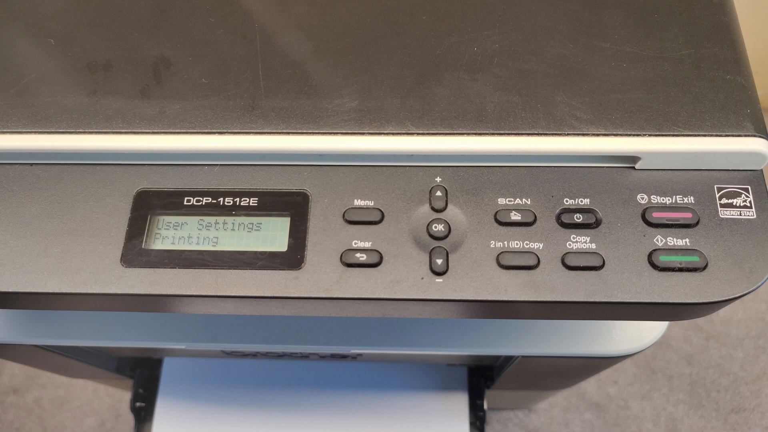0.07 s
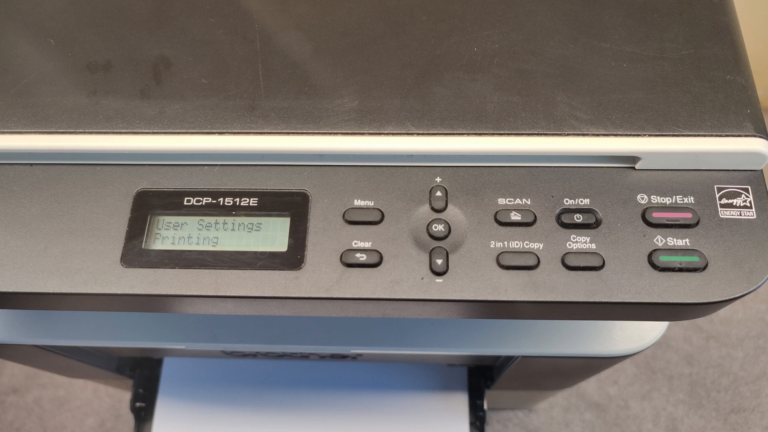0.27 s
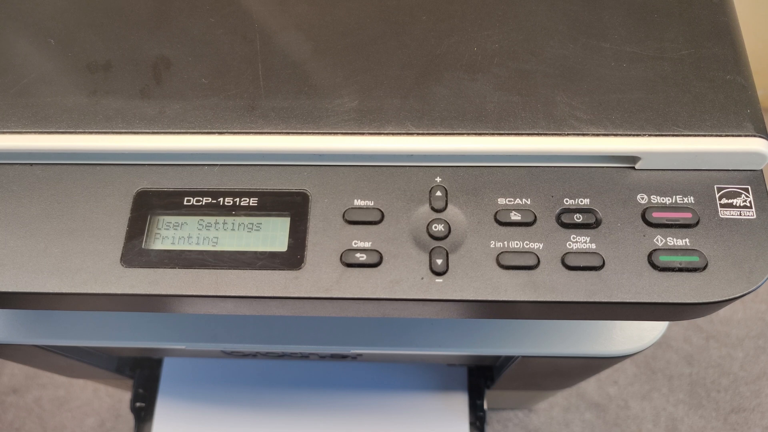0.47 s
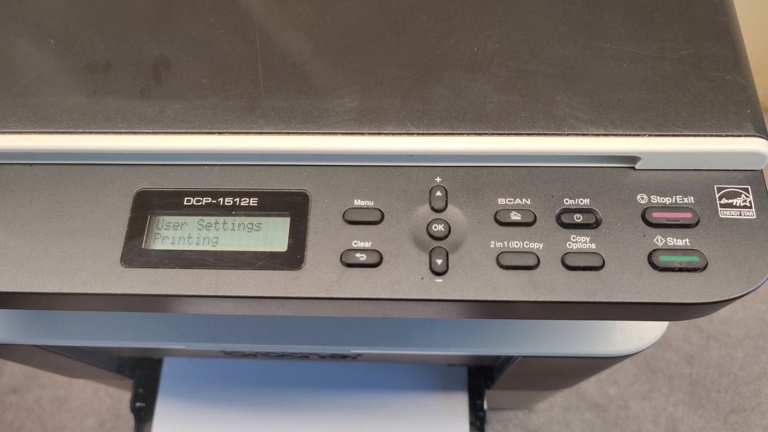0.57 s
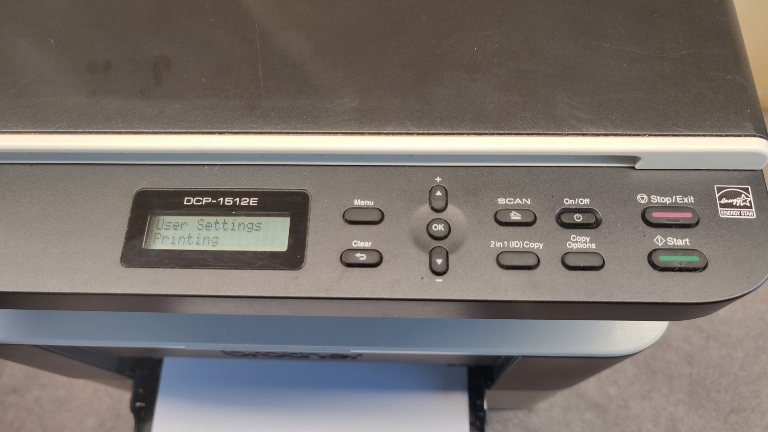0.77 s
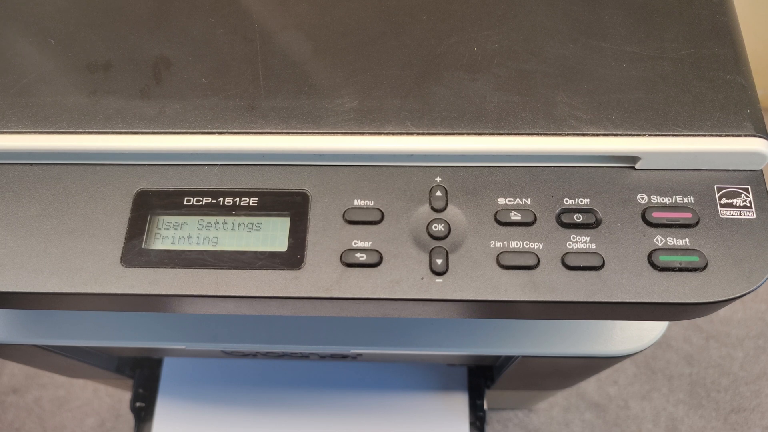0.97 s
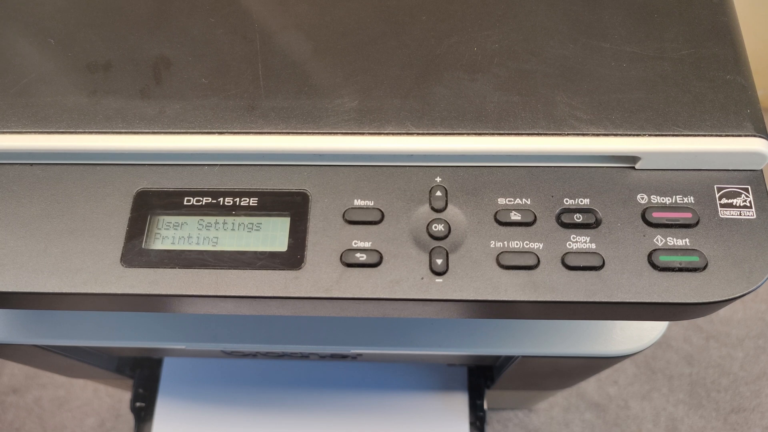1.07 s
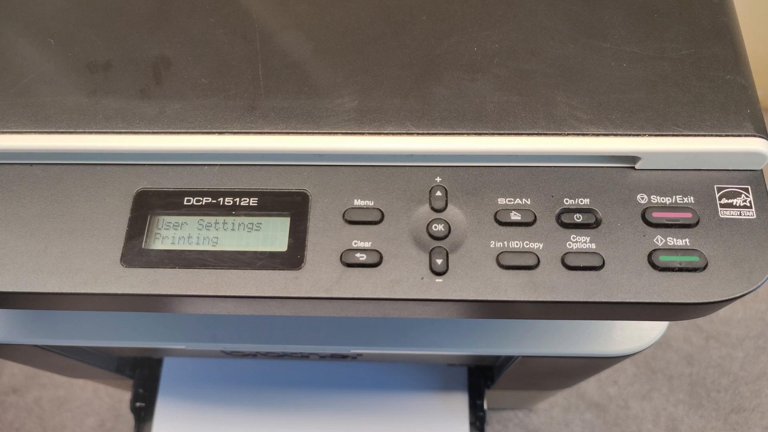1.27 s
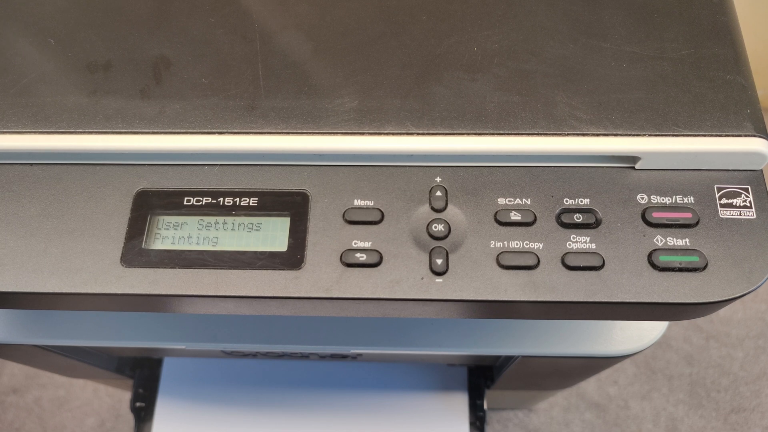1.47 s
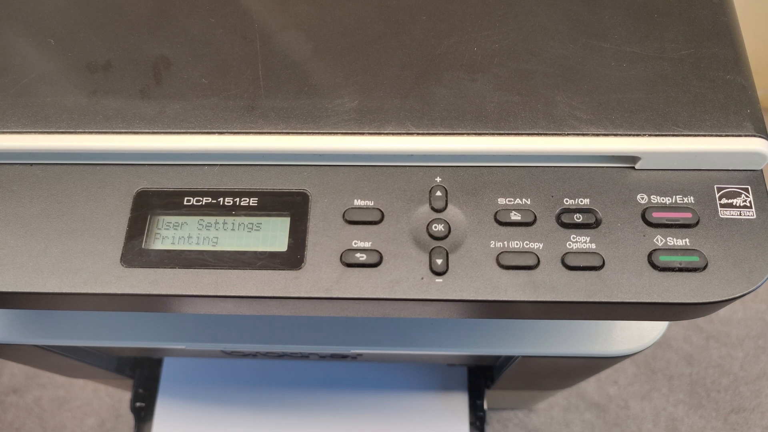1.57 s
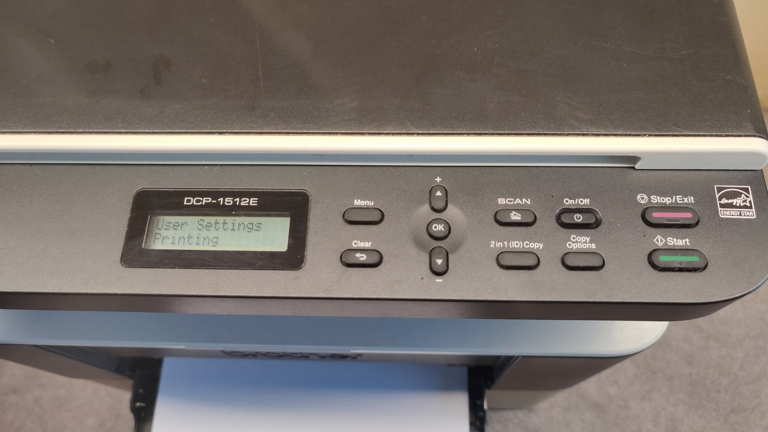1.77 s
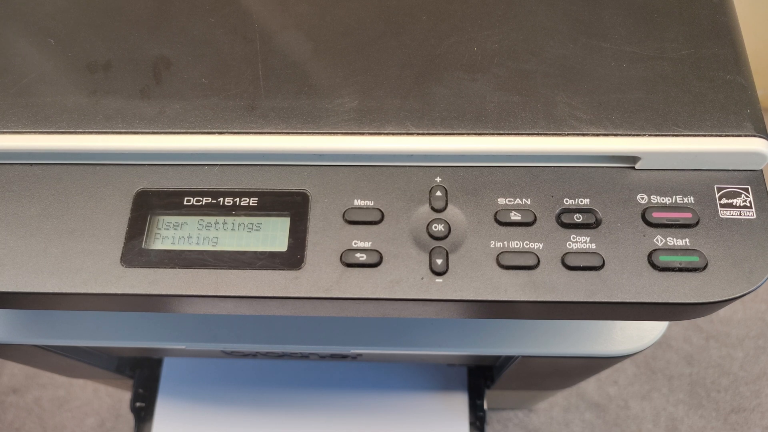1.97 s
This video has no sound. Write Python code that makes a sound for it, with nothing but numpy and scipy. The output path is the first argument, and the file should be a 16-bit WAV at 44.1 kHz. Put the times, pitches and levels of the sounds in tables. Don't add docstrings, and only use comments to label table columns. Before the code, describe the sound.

In a quiet room, a nearby laser printer ticks faintly, clacks loudly and whirs into motion; a mirror motor whine sweeps upward and vanishes while gears, fan hiss and sliding paper continue, with a late soft clack.

```python
import sys
import numpy as np
from scipy import signal
from scipy.io import wavfile
from scipy.ndimage import uniform_filter1d

SR = 44100
rng = np.random.default_rng(int(sys.argv[2]) if len(sys.argv) > 2 else 0)


def boost_factor(decibels):
    exponent = np.asarray(decibels, float) / 20
    return 10 ** exponent


def waveform_to_disk(signal):
    frames = np.transpose(np.atleast_2d(signal))
    scaled = np.clip(frames, -1, 1) * 32767
    samples = np.round(scaled).astype(np.int16)
    wavfile.write(sys.argv[1], SR, samples)


N = 88552
T = np.arange(N) / SR
POWER_ON_S = 0.388
MIC_EDGE_HZ = 15420


def evened(x):
    return x / np.sqrt(np.mean(x ** 2) + 1e-20)


def read(points, hz):
    f, value = np.transpose(points)
    return np.interp(np.log(hz + 1), np.log(f + 1), value)


def curve(points, axis=1):
    return np.interp(T, np.array(points)[:, 0], np.array(points)[:, axis])


def ramp(start_s, length_s):
    return np.clip((T - start_s) / length_s, 0, 1)


def wander(hz):
    rates = np.geomspace(hz / 8, hz, 12)
    return evened(sum(np.sin(2 * np.pi * (f * T + rng.random())) / np.sqrt(f) for f in rates))


def drifting(grid, bins):
    return evened(uniform_filter1d(uniform_filter1d(grid, bins, 0), 8, 1))


# (frequency [Hz], left-right level [dB])
LEFT_TILT = [(60, -2.5), (130, 0.5), (290, 0.5), (640, 5), (1400, -1.5), (3080, 1), (6770, -4), (14900, 4)]
# (frequency [Hz], phase lead [rad])
LEFT_LEAD = [(60, 0.3), (170, 0), (280, 0.2), (430, 0.94), (1000, 0.98), (2000, 1.23), (5000, 1.63),
             (15000, 1.5)]


def noise(db_of, same, patchy_db, placed=True):
    hz = np.fft.rfftfreq(1024, 1 / SR)
    a, b, c, d, patches = rng.standard_normal((N // 256 + 5, 513, 5)).T
    patches = drifting(patches, 8)
    shared = np.clip(read(same, hz), 0, 1)[:, None]
    left = a + 1j * b
    right = shared * left + np.sqrt(1 - shared ** 2) * (c + 1j * d)
    side = boost_factor(read(LEFT_TILT, hz) / 2) * np.exp(.5j * read(LEFT_LEAD, hz))
    side = side[:, None] ** placed
    colour = boost_factor(db_of(hz)[:, None] + patchy_db * patches)
    z = np.array([left * side, right / side]) * colour
    return evened(signal.istft(z, nperseg=1024, noverlap=768)[1][:, :N])


def tone(hz, db, pan_db, lead):
    turn = 2 * np.pi * (np.cumsum(hz) / SR + rng.random())
    left = boost_factor(pan_db / 2) * np.sin(turn + lead / 2)
    right = boost_factor(-pan_db / 2) * np.sin(turn - lead / 2)
    return np.sqrt(2) * boost_factor(db) * np.array([left, right])


def running():
    return ramp(POWER_ON_S, 0.02)


def speed():
    slip, catch_up_s = .15, .065
    return 1 - slip * np.exp(-np.maximum(T - .42, 0) / catch_up_s)


# (frequency [Hz], density [dB per Hz])
ROOM_COLOUR = [(12, -8), (36, -25.5), (56, -6), (85, -17.5), (176, -29.5), (272, -19), (340, -36),
               (500, -27), (2930, -47.5), (9000, -60.5), (14000, -55.5)]
# (frequency [Hz], left-right likeness [0-1])
ROOM_LIKENESS = [(60, 0.77), (240, 0.98), (940, 0.24), (3750, 0.084), (14900, 0.045)]


def room():
    level = boost_factor(-57 + 0.5 * wander(6.8))
    return level * noise(lambda f: read(ROOM_COLOUR, f), ROOM_LIKENESS, patchy_db=-3.0, placed=False)


# (order [multiple of shaft speed], level [dB])
FAN_ORDERS = [(1, -64), (2, -61.5), (3, -66), (4, -70), (5, -67), (6, -68.5), (7, -69.5)]


def fan():
    shaft_hz, wobble_db = 51.73, 2.5
    hz, out = shaft_hz * speed(), 0
    for order, db in FAN_ORDERS:
        pan_db, lead = read(LEFT_TILT, order * shaft_hz), read(LEFT_LEAD, order * shaft_hz)
        out = out + tone(order * hz, db + wobble_db * wander(9.14), pan_db, lead)
    return running() * out


# (frequency [Hz], width [Hz], level [dB])
PANELS = [(238.5, 40, 8), (627.6, 44, 8.5), (1300, 270, -11)]


def case_db(hz):
    power = sum(boost_factor(db) ** 2 / (1 + (2 * (hz - f) / width) ** 2) ** 2 for f, width, db in PANELS)
    return 10 * np.log10(power)


# (frequency [Hz], density [dB per Hz])
RUMBLE_COLOUR = [(35, -37), (55, -27), (80, -7), (120, -9), (420, -12), (520, -6), (751, -15.5), (1000, -9),
                 (1800, -29.5), (3000, -47)]
# (time [s], level [dB])
GEAR_EFFORT = [(0.47, -46.5), (0.66, -51.5), (0.67, -49.5), (1.082, -50), (1.116, -46), (1.156, -49.5),
               (1.982, -47), (2.0, -49.5)]
# (frequency [Hz], density [dB per Hz])
AIR_COLOUR = [(710, -52), (1200, -2.5), (1500, -4), (5220, -13), (7200, -16.5), (7900, -28), (9000, -30.5),
              (14300, -34.5), (15400, -52)]
# (frequency [Hz], left-right likeness [0-1])
LIKENESS = [(60, 1), (150, 0.88), (300, 0.99), (600, 0.64), (1200, 0.19), (2500, 0.91), (5000, 0.31),
            (14000, 0.22)]


def rumble_and_air():
    effort = boost_factor(curve(GEAR_EFFORT) + 48.5)
    rumble = boost_factor(-52) * noise(lambda f: read(RUMBLE_COLOUR, f), LIKENESS, patchy_db=2.0)
    panels = boost_factor(-57.5) * noise(case_db, LIKENESS, patchy_db=-0.1)
    air = boost_factor(-58.5) * noise(lambda f: read(AIR_COLOUR, f), LIKENESS, patchy_db=-2.95)
    return running() * (effort * (rumble + panels) + air)


# (time [s], level [dB])
SHEET_CONTACT = [(.58, -9.5), (.7, -5), (.95, -14.5), (1.4, -6), (1.7, -2), (1.87, 0), (2.01, 2.5)]


def sizzle():
    centre_hz, width_hz = 14250, 800
    band = noise(lambda f: -20 * np.log10(1 + (2 * (f - centre_hz) / width_hz) ** 2), LIKENESS, patchy_db=4.0)
    db = -69 + 0.59 * curve(SHEET_CONTACT) + 1.5 * wander(22)
    return boost_factor(db) * ramp(.53, 0.016) * band


# (frequency [Hz], density [dB per Hz])
PAPER_COLOUR = [(710, -48), (1200, 0), (1780, -8.5), (2250, -4), (5000, -7.5), (7300, -12.5), (8000, -24.5),
                (14100, -24), (15300, -14.5)]


def paper():
    grain = boost_factor(1.3 * evened(uniform_filter1d(rng.standard_normal(N), 200)))
    rub = noise(lambda f: read(PAPER_COLOUR, f), LIKENESS, patchy_db=2.0)
    return (T > SHEET_CONTACT[0][0]) * boost_factor(-53.5 + curve(SHEET_CONTACT)) * grain * rub


# (time [s], length [s], frequency [Hz], level [dB])
PANEL_RINGS = [
    (.485, .06, 905, -60),
    (.545, .065, 1400, -58),
    (.664, .03, 2460, -57),
]


def rings():
    out = 0
    for s, length, hz, db in PANEL_RINGS:
        swell = np.sin(np.pi * ramp(s, length) ** .7)
        out = out + swell * tone(hz + 0 * T, db, 0, .6)
    return out


# (time [s], whine [Hz])
MIRROR_PITCH = [(.63, 1300), (.672, 2400), (.74, 4290), (.82, 6460), (.86, 7330), (.962, 9460),
                (1.102, 12070), (1.23, 14250), (1.32, 15750)]
# (order [multiple of whine], level [dB], heard from [s])
WHINE_ORDERS = [(1 / 2, -3, 1.12), (1, 0, .635), (3 / 2, -6, .915), (2, -4, .775), (3, -8, .73)]
# (frequency [Hz], level [dB])
HOUSING_DB = [(1900, -70), (2450, -62), (3000, -69), (3800, -64), (5000, -67), (6300, -66), (7100, -61),
              (7800, -84), (11000, -80), (13000, -73), (14250, -65), (14700, -74), (15500, -76)]


def mirror():
    gain_db, ripple_db, fuzz_hz = 2.5, 2, 45
    hz, out = curve(MIRROR_PITCH), 0
    for order, db, from_s in WHINE_ORDERS:
        heard = (order * hz < MIC_EDGE_HZ) * ramp(from_s, .025) * (T < MIRROR_PITCH[-1][0])
        ripple = boost_factor(gain_db + ripple_db * np.array([wander(80), wander(80)]))
        whine = tone(order * hz + fuzz_hz * wander(150), db + read(HOUSING_DB, order * hz), -1.5, 1.2)
        out = out + heard * ripple * whine
    return out


# (order [multiple of tooth rate], level [dB], mesh [load column, 0 = none],
# left-right level [dB], left lead [rad])
GEAR_ORDERS = [
    (.25, -.5, 2, -11, 0.91),
    (.294, .5, 4, 5.5, 0.7),
    (.3122, -59.5, 0, -1, 0.15),
    (.4995, 1.5, 3, 5.5, 0.99),
    (.749, -73, 0, -14, 1),
    (1.0, 5, 1, 1, -1.4),
    (1.769, -76, 0, -1, 0.46),
]
# (time [s], motor pinion [dB], drum [dB], idler [dB], roller [dB])
MESH_LOAD = [(0.62, -70, -62, -60, -72), (0.704, -61, -52, -66, -55), (0.758, -64, -55, -63, -75),
             (0.808, -62, -59, -63, -57), (0.858, -77, -62, -59, -61), (0.93, -60, -52, -67, -65),
             (1.008, -66, -62, -60, -61), (1.142, -60, -53, -69, -62), (1.188, -69, -64, -63, -54),
             (1.226, -69, -58, -59, -70), (1.334, -59, -53, -64, -56), (1.392, -64, -58, -64, -65),
             (1.606, -66, -57, -61, -56), (1.722, -61, -56, -68, -64), (1.756, -59, -58, -72, -56),
             (1.838, -71, -57, -60, -59), (1.946, -60, -56, -69, -53), (2.0, -64, -60, -65, -68)]


def gears():
    tooth_hz = 1899.5 * speed()
    out = 0
    for order, db, mesh, pan_db, lead in GEAR_ORDERS:
        low = order < .6
        load_db = curve(MESH_LOAD, axis=mesh) if mesh else 1.1 * wander(6.46)
        if mesh in (1, 2):
            load_db = load_db - 6 * np.clip((.64 - T) / .15, 0, 1)
        hz = order * tooth_hz * (1 + .006 * low * wander(10))
        wobble_db = 1.5 * 2.2 ** low * wander(30)
        out = out + tone(hz, db + load_db + wobble_db, pan_db, lead)
    return ramp(.41, 0.043) * out


# (frequency [Hz], level [dB], t60 [s])
LATCH_MODES = [(106, -2.5, 0.16), (272, 2, 0.032), (424, -13, 0.05), (633, 2.5, 0.064), (1010, -11, 0.048),
               (1190, 3, 0.055), (2097, 0, 0.11)]


def latch_ring(t, burst, bright):
    short = t[:1500]
    rattle = rng.standard_normal((3, 1500))[0]
    knock = rattle * np.minimum(short / 0.0011, 1) * np.exp(-short / burst)
    modes = 0
    for hz, db, t60 in LATCH_MODES:
        tilt = (hz / 1000) ** (bright - 1)
        modes = modes + boost_factor(db - 60 * t / t60) * tilt * np.sin(2 * np.pi * hz * t)
    return signal.fftconvolve(knock, modes)[:6000]


# (frequency [Hz], density [dB per Hz])
CRASH_COLOUR = [(88, -30), (150, -21), (636, -12), (900, 0), (1180, 0), (1700, -14), (2100, -7), (2270, -9),
                (15000, -44)]
# (frequency [Hz], t60 [s])
CRASH_DECAY = [(200, 0.067), (1000, 0.021), (4000, 0.12), (12000, 0.036)]


def loose_parts(t, burst, bright):
    shake = rng.standard_normal((3, 6000))
    hz, at, z = signal.stft(shake[0] + 1.2 * shake[1:], SR, nperseg=128)
    colour = read(CRASH_COLOUR, hz) + 20 * (bright - 1) * np.log10(hz / 1000 + 0.014)
    decay = 60 * np.maximum(at - burst, 0) / read(CRASH_DECAY, hz)[:, None]
    crash = signal.istft(z * boost_factor(colour[:, None] - decay), SR, nperseg=128)[1][:, :6000]
    rattle = boost_factor(2.7 * evened(uniform_filter1d(shake[0, ::-1], 60)))
    return crash * np.minimum(t / 0.0022, 1) * rattle


# (time [s], level [dB], burst [s], brightness [exponent])
CLACK_EVENTS = [
    (.216, -71, 0.0035, 0.89),
    (.359, -77, 0.0038, 2.2),
    (0.3858, -47.5, 0.014, 0.86),
    (0.4012, -38, 0.0076, 1),
    (.412, -49.5, 0.024, 0.24),
    (0.429, -46.5, .012, 0.23),
    (1.855, -55.5, 0.0057, 0.96),
]


def clacks():
    out, t = np.zeros((2, N + 12000)), T[:6000]
    for s, db, burst, bright in CLACK_EVENTS:
        ring = latch_ring(t, burst, bright)
        crash = loose_parts(t, burst, bright)
        hit = crash / np.std(crash[:, :600]) + boost_factor(-2.5) * ring / np.std(ring[:600])
        out[:, round(s * SR):][:, :6000] += boost_factor(db) * hit
    return out[:, :N]


def scene():
    rubbing = room() + rumble_and_air() + sizzle() + paper()
    return rubbing + gears() + fan() + mirror() + clacks() + rings()


def thinned(x):
    hz, at, z = signal.stft(x, SR, nperseg=1024)
    draw = rng.standard_normal((2, len(hz), len(at)))
    patches = drifting(draw[0], 6)
    depth_db = 7.5 * np.clip((hz - 5200) / 2400, 0, 1)[:, None]
    top_hz = 14750 + 350 * evened(uniform_filter1d(draw[1, 0], 5))
    top = (hz > top_hz[:, None]).T & (at > POWER_ON_S + .05)
    level = uniform_filter1d(abs(z).mean(0), 5, 0)
    weak = level < 3 * np.median(level, axis=1)[:, None]
    gain_db = weak * (depth_db * np.minimum(patches, .7) - 25 * top)
    return signal.istft(z * boost_factor(gain_db), SR, nperseg=1024)[1][:, :N]


def top_cut(x):
    return signal.sosfilt(signal.butter(12, 15470, fs=SR, output="sos"), x)


def record(dry):
    low_pass = signal.firwin(511, MIC_EDGE_HZ, window=("kaiser", 9), fs=SR)
    mix = signal.oaconvolve(thinned(dry), low_pass[None], "same")
    return top_cut(mix)


dry = scene()
out = record(dry)
waveform_to_disk(out)
```